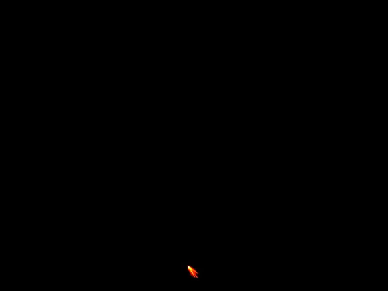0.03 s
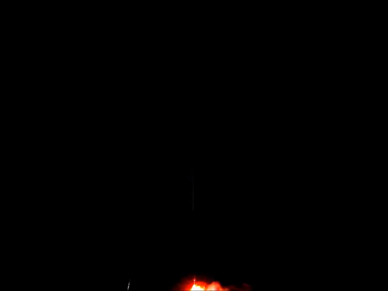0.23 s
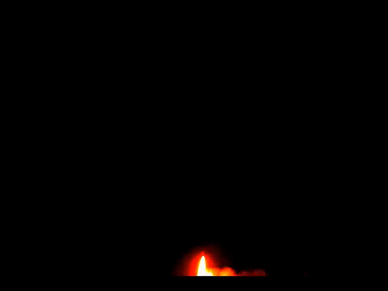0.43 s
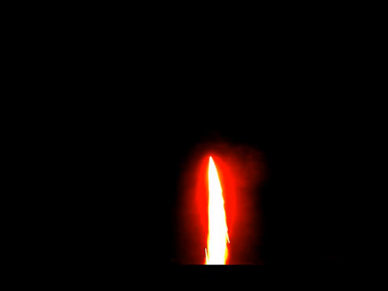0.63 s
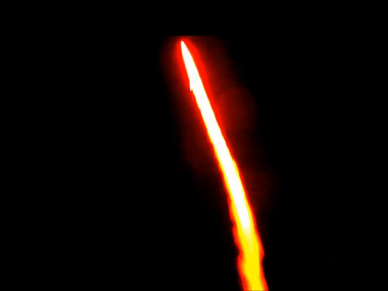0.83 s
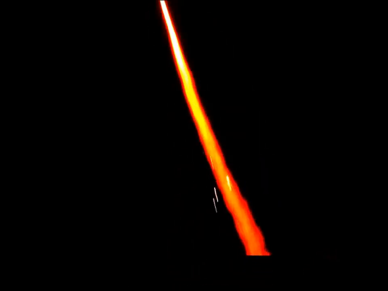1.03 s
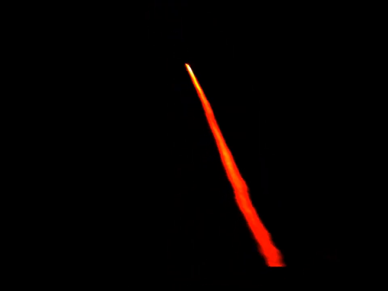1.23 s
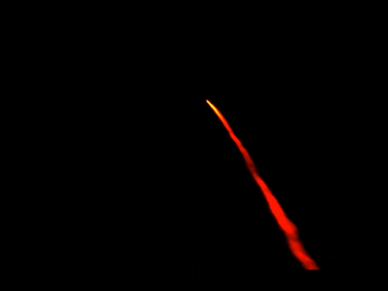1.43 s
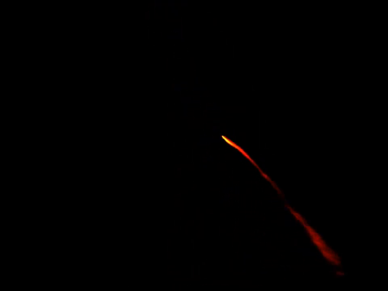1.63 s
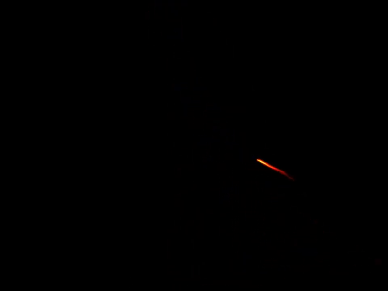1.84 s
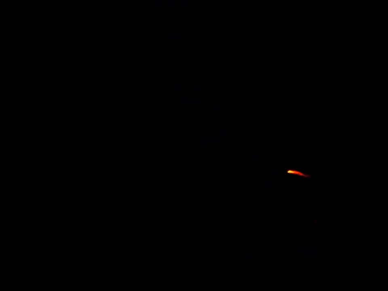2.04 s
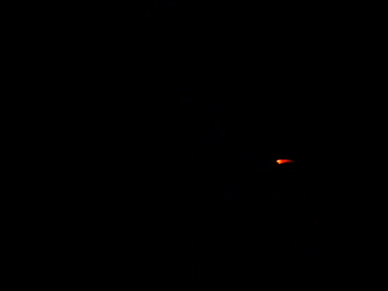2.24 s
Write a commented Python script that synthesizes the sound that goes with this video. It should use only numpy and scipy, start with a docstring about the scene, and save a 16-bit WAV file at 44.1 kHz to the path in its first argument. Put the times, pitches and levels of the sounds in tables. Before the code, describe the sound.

Firework rocket catching and whooshing upward with a crackling hiss, followed by low wind rumble.

```python
"""Over faint night air, a firework rocket sputters, catches and roars upward, its jet crackling.
The ground echo lags more and more as it climbs, so the hiss sweeps downward in colour.
The jet moves towards the centre overhead and burns out after a second; the surroundings ring briefly.
Then wind buffets the two microphone ports."""
import sys
import numpy as np
from scipy import signal
from scipy.fft import rfft, irfft
from scipy.io import wavfile
from scipy.ndimage import map_coordinates

SR = 44100
rng = np.random.default_rng(int(sys.argv[2]) if len(sys.argv) > 2 else 0)


def store_wav(level_fs):
    """Save 16-bit WAV to argv[1]."""
    pcm = np.round(np.clip(np.atleast_2d(level_fs), -1, 1) * 32767)
    wavfile.write(sys.argv[1], SR, pcm.T.astype(np.int16))


N = 105840
T, HZ = np.arange(N) / SR, np.fft.rfftfreq(N, 1 / SR)


def amp(db):
    """Decibels to gain."""
    return 10 ** (np.asarray(db) / 20)


def unit(x):
    """Scales to rms 1."""
    return x / np.sqrt(np.mean(x ** 2) + 1e-20)


def curve(rows, column=1):
    """Table column over time."""
    rows = np.array(rows)
    return np.interp(T, rows[:, 0], rows[:, column])


def spectrum(rows, hz=HZ):
    """Table over log frequency."""
    f, value = np.transpose(rows)
    return np.interp(np.log(hz + 1), np.log(f + 1), value)


def shape(x, gain):
    """Filters by a gain per frequency."""
    return irfft(rfft(x) * gain, N)


def noise(channels=2):
    """White noise."""
    return rng.standard_normal((channels, N))


def wander(rate_hz, channels=1):
    """Random drift up to about rate_hz, rms 1."""
    return unit(shape(noise(channels), np.exp(-(HZ / rate_hz) ** 2)))


def bump(at_s, width_s):
    """Gaussian in time, peak 1."""
    return np.exp(-((T - at_s) / width_s) ** 2)


def resonate(x, hz, width_hz):
    """Unity-gain resonance following the curve hz."""
    turn = np.exp(2j * np.pi * np.cumsum(hz) / SR)
    pole = np.exp(-np.pi * width_hz / SR)
    return 2 * (turn * signal.lfilter([1 - pole], [1, -pole], x / turn)).real


# Flame envelope (time [s], level [dB])
FLAME_LEVEL = [(0.03, -81), (0.05, -59), (0.093, -45.5), (0.12, -57), (0.21, -56), (0.245, -43),
               (0.33, -36.5), (0.4, -53), (0.65, -58.5), (0.85, -43), (1.14, -46.5), (1.22, -66.5)]
# Flame spectrum (frequency [Hz], level [dB])
FLAME_SPECTRUM = [(25, -14), (70, -1.5), (150, 5), (290, 3.5), (450, -13.5), (1000, -54)]


def flame():
    """Low rush of the exhaust, first striking the ground, then from overhead."""
    rush = shape(noise(channels=1) + 0.13 * noise(), amp(spectrum(FLAME_SPECTRUM)))
    return unit(rush) * amp(curve(FLAME_LEVEL))


# Air spectrum (frequency [Hz], level [dB])
AIR_SPECTRUM = [(1500, -2), (3300, -5.5), (4600, -14), (7000, -17), (10000, -35.5), (15000, -58)]
# Air envelope (time [s], level [dB])
AIR_LEVEL = [(0.034, -100), (0.04, -55), (1.9, -54), (2.3, -52)]


def night_air():
    """Faint, wide hiss of the open air."""
    hiss = shape(noise() + noise(channels=1), amp(spectrum(AIR_SPECTRUM)))
    return unit(hiss) * amp(curve(AIR_LEVEL))


# Jet envelope (time [s], level [dB])
JET_LEVEL = [(0.035, -92), (0.038, -53.5), (0.074, -49), (0.093, -24), (0.1, -32.5), (0.118, -40),
             (0.165, -38.5), (0.198, -30), (0.213, -33), (0.232, -24.5), (0.253, -12.5), (0.272, -20.5),
             (0.316, -17.5), (0.352, -11.5), (0.373, -9), (0.383, -13), (0.5, -14.5), (0.618, -11.5),
             (0.816, -6.5), (0.925, -8), (0.99, -19), (1.1, -33.5), (1.15, -43.5), (1.32, -54.5),
             (1.4, -66.5)]
# Jet spectrum (frequency [Hz], level [dB])
JET_SPECTRUM = [(24, -78), (69, -42.5), (183, -22), (300, -14), (400, -8.5), (1020, -3.5), (1730, -1),
                (4460, -5.5), (6010, -10), (8520, -11.5), (10700, -18.5), (15500, -34)]
# Shelf gains (time [s], low [dB], treble [dB])
JET_SHELVES = [(0.05, 15.5, -1), (0.095, -3.5, 5.5), (0.2, 0, -3), (0.25, 1.5, -4.5), (0.285, -4, -2.5),
               (0.35, -2, -3), (0.4, -3, 1.5), (0.49, 1, -1.5), (0.63, -2.5, 2.5), (0.75, -3, 0),
               (0.93, 1, -1.5), (1.06, 8, -4), (1.22, 3, -0.5)]
# Crackle in the jet (time [s], power share [0-1])
JET_CRACKLE = [(0.1, 0.2), (0.3, 0.8), (0.45, 0.38), (0.65, 0.025)]
# Broad resonance, rising with rocket speed (time [s], centre [Hz], gain [linear])
JET_ROAR = [(0.655, 1750, 0.081), (0.69, 2050, 1.2), (0.76, 2400, 0.44), (0.81, 3400, 1.0),
            (0.92, 3800, 0.83), (0.97, 3870, 0.079)]


def jet(cracks_per_s=2500, crack_spread_db=2.5, low_hz=945, treble_hz=5500, flicker_db=0.61):
    """Turbulent hiss and small shocks from the nozzle, as two uncorrelated signals."""
    sizes = amp(crack_spread_db * np.minimum(rng.exponential(1, (2, N)), 4))
    shocks = sizes * (rng.random((2, N)) < cracks_per_s / SR)
    cracks = unit(shape(shocks, HZ > 0))
    share = curve(JET_CRACKLE)
    gas = np.sqrt(1 - share) * noise() + np.sqrt(share) * cracks
    gas = unit(shape(gas, amp(spectrum(JET_SPECTRUM))))
    low = shape(gas, 1 / (1 + (HZ / low_hz) ** 4))
    treble = shape(gas, 1 - 1 / (1 + (HZ / treble_hz) ** 6))
    gas += low * (amp(curve(JET_SHELVES)) - 1)
    gas += treble * (amp(curve(JET_SHELVES, column=2)) - 1)
    gas += curve(JET_ROAR, column=2) * resonate(gas, curve(JET_ROAR), width_hz=950)
    return gas * amp(curve(JET_LEVEL) + flicker_db * wander(rate_hz=124))


# Ground echo delay (time [s], lag [ms])
ECHO_LAG = [(0.2, 1.02), (0.43, .94), (0.51, 1.25), (0.56, 1.65), (0.64, 2.72), (0.71, 3.97), (0.86, 7.26),
            (0.94, 8.7), (1.01, 9.55), (1.12, 10.4)]


def ground_echo(x, echo_gain=0.5, cutoff_hz=2300, swoop_gain=1.45):
    """Adds a dull echo; its growing lag sweeps a comb down, the lowest peak swooping at lift-off."""
    lag_samples = curve(ECHO_LAG) * SR / 1000
    dull = shape(x, 1 / np.sqrt(1 + (HZ / cutoff_hz) ** 2))
    echo = np.array([map_coordinates(side, [np.arange(N) - lag_samples], order=3) for side in dull])
    swoop = bump(at_s=0.564, width_s=0.065) * resonate(x, SR / lag_samples, width_hz=50)
    return x + echo_gain * echo + swoop_gain * swoop


# Likeness of the ports (frequency [Hz], coherence [0-1])
PORT_COHERENCE = [(100, .88), (700, .98), (3100, .74), (7000, .85), (15000, .6)]
# Phase between ports at aside = 1 (frequency [Hz], left lead [rad])
PORT_PHASE = [(1400, 0.0), (2500, -1.5), (3300, -.3), (4050, -.9), (4600, .7), (6600, .1), (10500, -.1),
              (13000, -.9)]
# Balance at aside = 1 (frequency [Hz], left minus right [dB])
PORT_BALANCE = [(100, -2), (1200, 0), (2050, 4.5), (3300, -9), (5400, -5), (8500, 1.5)]


def ports(x, aside):
    """Jet at the two microphone ports; aside scales level and phase differences (0 = centre)."""
    coherence = spectrum(PORT_COHERENCE)
    lean = amp(aside * spectrum(PORT_BALANCE) / 2)
    phase_lag = np.exp(-1j * aside * spectrum(PORT_PHASE))
    right = shape(x[0], coherence) + shape(x[1], np.sqrt(1 - coherence ** 2))
    return np.array([shape(x[0], lean), shape(right, phase_lag / lean)])


def climb(x, start_s=0.66, end_s=0.91):
    """The jet moves from one side towards the centre as it rises overhead."""
    risen = np.interp(T, [start_s, end_s], [0, 1])
    return (1 - risen) * ports(x, aside=1) + risen * ports(x, aside=0.22)


# Outdoor decay (frequency [Hz], T60 [s])
OUTDOOR_T60 = [(150, 0.27), (1000, 0.78), (4000, 1)]


def surroundings(x, level_db=-27, build_s=0.013):
    """Diffuse outdoor echoes, the bass dying first."""
    hz, t, bins = signal.stft(noise(), SR, nperseg=256)
    decay = amp(-60 * t / spectrum(OUTDOOR_T60, hz)[:, None])
    tail = signal.istft(bins * decay, SR, nperseg=256)[1][:, :N]
    tail *= np.minimum(T / build_s, 1) ** 2
    tail /= np.linalg.norm(tail[0])
    return amp(level_db) * signal.fftconvolve(x, tail, axes=1)[:, :N]


# Wind at the left port (time [s], level [dB])
BREEZE_LEFT = [(1.1, -87), (1.415, -69), (1.44, -37.5), (1.475, -42.5), (1.55, -31), (1.62, -33.5),
               (1.645, -46), (1.71, -30), (1.85, -24.5), (1.95, -26.5), (2.07, -28.5), (2.12, -24),
               (2.23, -22.5), (2.34, -27.5), (2.4, -38)]
# Wind at the right port (time [s], level [dB])
BREEZE_RIGHT = [(1.23, -49), (1.3, -40), (1.5, -57), (1.8, -46.5), (1.95, -50), (2.0, -33), (2.15, -48),
                (2.25, -34.5), (2.4, -40.5)]
# Single eddies (time [s], left peak [dB], right peak [dB])
WIND_BUFFETS = [(1.266, -67.5, -29.5), (1.308, -67, -33.5), (1.551, -21.5, -56), (1.583, -24.5, -60.5),
                (1.614, -26, -66), (1.675, -29, -67), (1.755, -23, -27.5), (1.811, -27.5, -37),
                (1.849, -26, -45), (1.878, -23.5, -48), (1.904, -23, -36), (1.934, -23, -58),
                (1.987, -30, -30), (2.046, -21.5, -49), (2.148, -26, -60), (2.219, -31, -29),
                (2.318, -22, -45), (2.346, -23, -53)]


def wind(gust_db=2.1, buffet_s=0.0048, ref_db=-23, ref_hz=314, db_per_octave=46, low_cut_hz=35.1):
    """Eddies thump each port on its own; stronger and sharper ones reach higher in pitch."""
    breeze_db = np.array([curve(BREEZE_LEFT), curve(BREEZE_RIGHT)])
    breeze = amp(breeze_db + gust_db * wander(rate_hz=97, channels=2)) * (T > BREEZE_LEFT[0][0])
    thumps = sum(amp([[left_db], [right_db]]) * bump(at_s, np.sqrt(2) * buffet_s)
                 for at_s, left_db, right_db in WIND_BUFFETS)
    push = np.hypot(breeze, thumps) + 1e-6
    octaves = (20 * np.log10(push) - ref_db) / db_per_octave + 0.3 * thumps / push
    octaves += 0.63 * bump(at_s=1.834, width_s=0.097)  # brief brightening
    cutoff_hz = ref_hz * 2 ** octaves
    air = shape(noise(), HZ ** 2 / (HZ ** 2 + low_cut_hz ** 2))
    rumble = np.zeros((2, N))
    for hz in 20 * 2 ** (np.arange(15) / 2):  # half-octave bands
        band = shape(air, np.maximum(1 - 2 * abs(np.log2((HZ + 1e-9) / hz)), 0))
        rumble += band / np.sqrt(1 + (hz / cutoff_hz) ** (2 * 3.33))  # moving low-pass, order 3.33
    return rumble * push * np.sqrt(SR / 2 / cutoff_hz)


def scene():
    """Rocket, its echoes, wind and night air."""
    rocket = climb(ground_echo(jet())) + flame()
    return rocket + surroundings(rocket) + wind() + night_air()


# Microphone notches (centre [Hz], width [Hz], gain [dB])
MIC_NOTCHES = [(5950, 135, -5.5), (7810, 92, -15)]
OVERLOAD_DB, AGC_S, AGC_KNEE_DB = 1.5, 0.19, -13.5
LOW_CUT_HZ, BAND_LIMIT_HZ = 41, 15600


def record(dry):
    """Microphone: soft overload, slow gain control, two narrow notches, low cut, band limit."""
    squashed = amp(OVERLOAD_DB) * np.tanh(dry / amp(OVERLOAD_DB))
    step = 1 / (AGC_S * SR)
    power = signal.lfilter([step], [1, step - 1], (squashed ** 2).mean(0))
    levelled = squashed / np.sqrt(1 + power / amp(AGC_KNEE_DB) ** 2)
    notches_db = sum(db * np.exp(-((HZ - hz) / width) ** 2) for hz, width, db in MIC_NOTCHES)
    out = shape(levelled, amp(notches_db))
    out = signal.sosfilt(signal.butter(2, LOW_CUT_HZ, "high", fs=SR, output="sos"), out)
    lowpass = signal.firwin(611, BAND_LIMIT_HZ, window=("kaiser", 9), fs=SR)
    return signal.oaconvolve(out, lowpass[None], "same")


dry = scene()
out = record(dry)
store_wav(out)
```